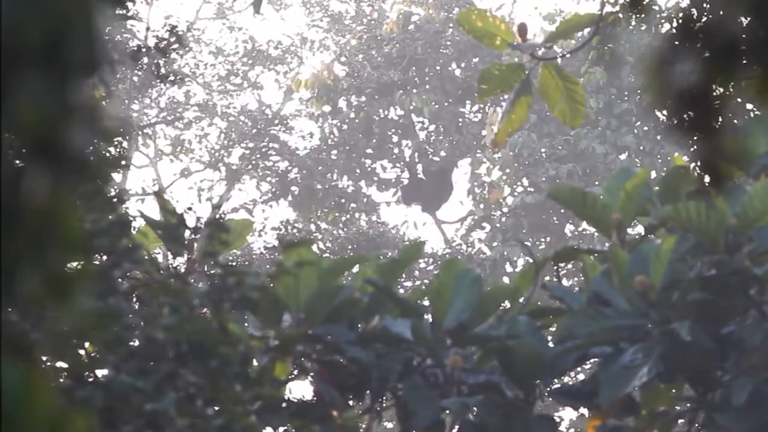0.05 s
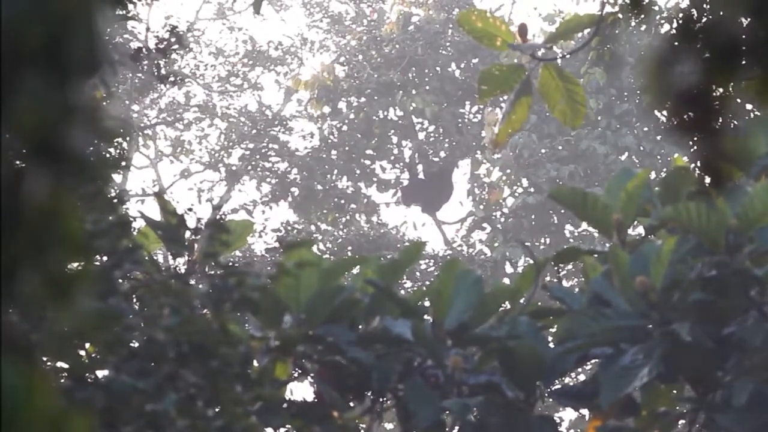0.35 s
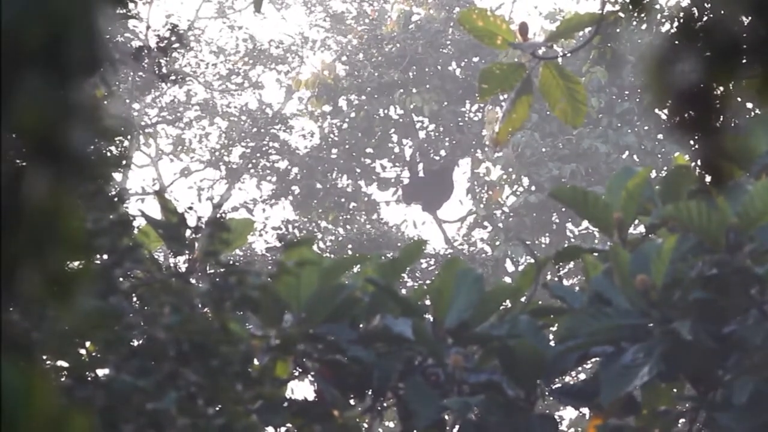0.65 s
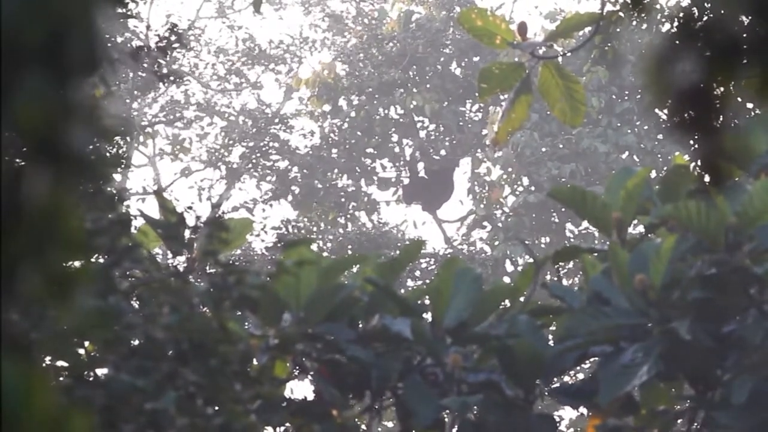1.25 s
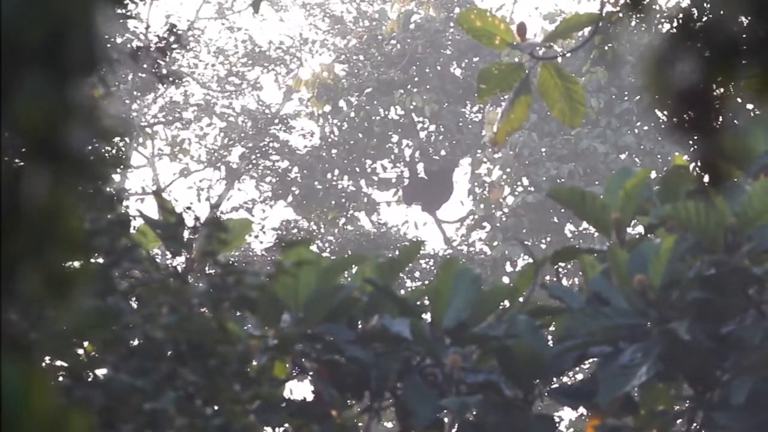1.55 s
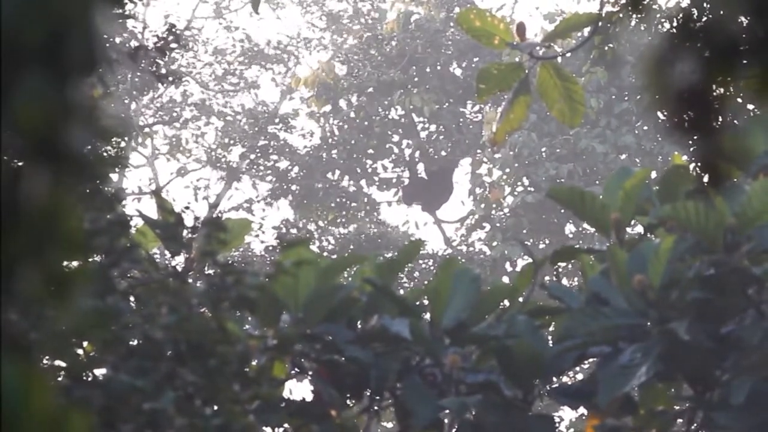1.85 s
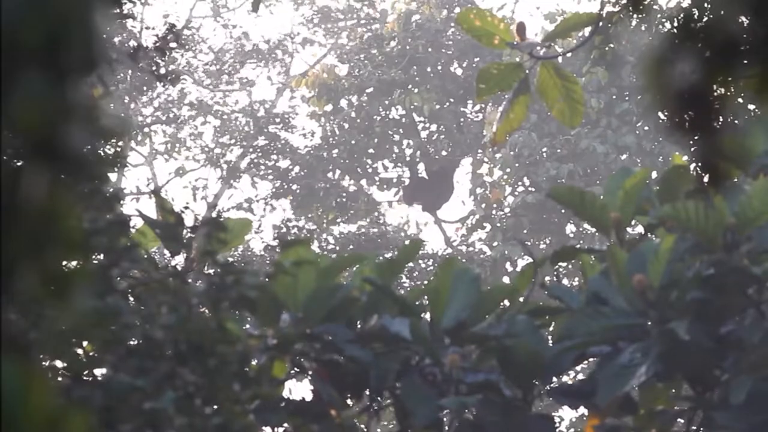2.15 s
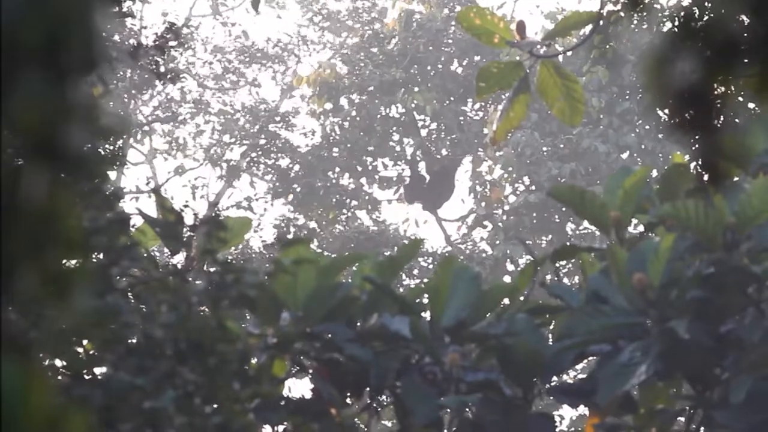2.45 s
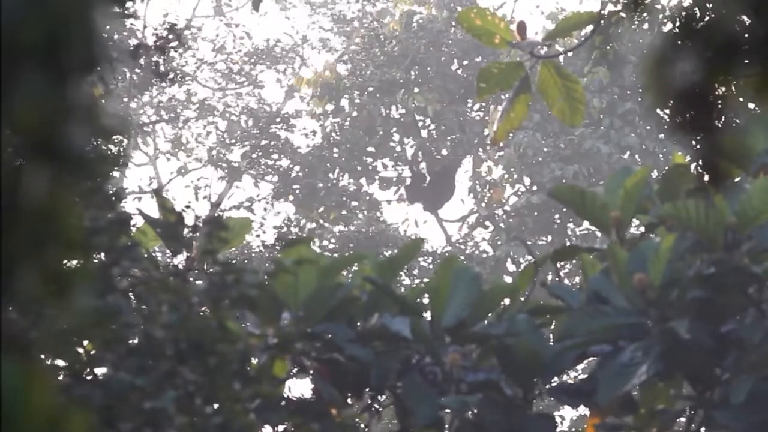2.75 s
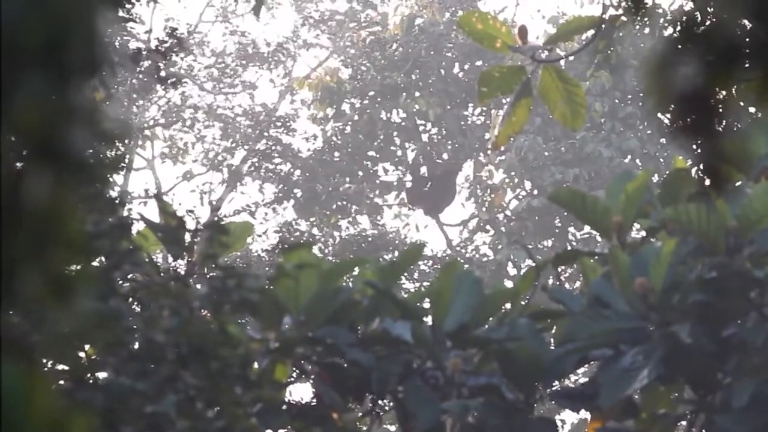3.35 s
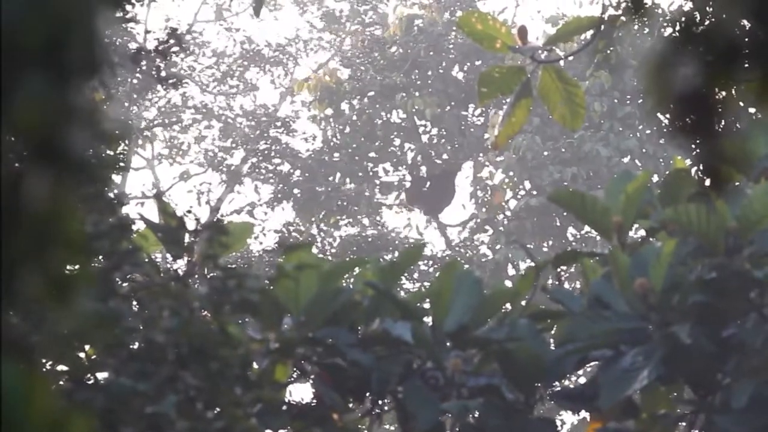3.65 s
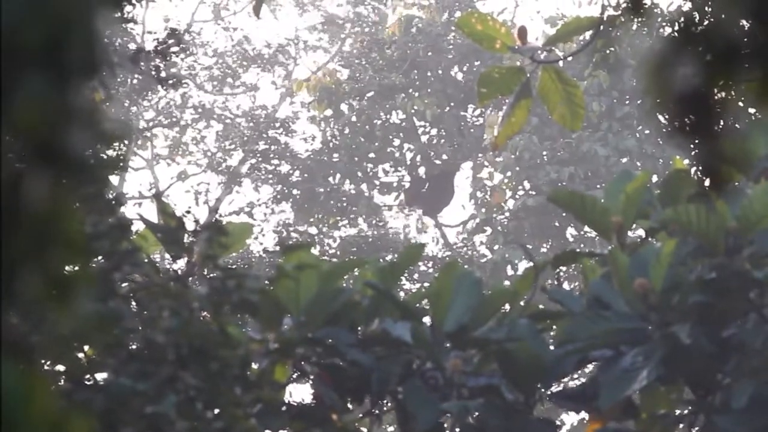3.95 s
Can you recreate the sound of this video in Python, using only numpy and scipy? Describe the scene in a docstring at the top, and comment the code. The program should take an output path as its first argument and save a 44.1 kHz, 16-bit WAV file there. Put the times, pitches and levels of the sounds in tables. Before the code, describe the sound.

Wild apes hoot loudly in an echoing forest over a steady high insect buzz.

```python
"""Rainforest with siamangs calling. One holds a high note that breaks into a run of loud falling hoots,
a second adds lower hoots, and throat sacs boom underneath. The trees return echoes and a long tail.
Cicadas buzz and a cricket ticks throughout, over steady forest noise; a katydid scrapes its wings
and small birds whistle near the end."""
import sys
import numpy as np
from scipy import signal
from scipy.fft import rfft, irfft
from scipy.io import wavfile

SR = 44100
rng = np.random.default_rng(int(sys.argv[2]) if len(sys.argv) > 2 else 0)


def to_wav(sig):
    """Store sig (one row per channel, or 1-D mono) as 16-bit WAV at the path in sys.argv[1].

    Samples outside -1..1 are clipped; the rate is SR.
    """
    pcm = np.clip(np.atleast_2d(sig), -1, 1) * 32767
    pcm = np.round(pcm).astype(np.int16)
    wavfile.write(sys.argv[1], SR, pcm.T)  # frames by channels


N = 176400
TIME = np.arange(N) / SR
RELEASE_S = 0.0095


def from_db(db):
    """Decibels to gain."""
    return 10 ** (np.asarray(db) / 20)


def unit_rms(x):
    """Scale to unit rms."""
    return x / np.sqrt(np.mean(x ** 2) + 1e-20)


def ramp(u):
    """Smooth step from 0 to 1."""
    return np.sin(np.pi / 2 * np.clip(u, 0, 1)) ** 2


def phase_of(hz):
    """Running phase of a pitch curve."""
    return 2 * np.pi * np.cumsum(hz) / SR


def high_pass(x, hz):
    """Third-order Butterworth high-pass."""
    return signal.sosfilt(signal.butter(3, hz, "high", fs=SR, output="sos"), x + 1e-18)


def noise(gain_at):
    """Unit-rms noise shaped by gain_at(frequency)."""
    hz = np.maximum(np.fft.rfftfreq(N, 1 / SR), 1)
    return unit_rms(irfft(rfft(rng.standard_normal(N)) * gain_at(hz), N))


def coloured(spectrum):
    """Unit-rms noise following (frequency [Hz], relative density [dB]) points."""
    hz, db = np.transpose(spectrum)
    return noise(lambda f: from_db(np.interp(np.log(f), np.log(hz), db)))


def drift(rate_hz):
    """Unit-rms random wavering up to about rate_hz."""
    return noise(lambda f: 1 / (1 + (f / rate_hz) ** 2))


def glides(notes, edge_s, jitter):
    """Wavering sine glides with soft edges."""
    out = np.zeros(N)
    waver = 1 + jitter * drift(35)
    for start_s, length_s, from_hz, to_hz, db in notes:
        span = (TIME >= start_s) & (TIME < start_s + length_s)
        t = TIME[span] - start_s
        hz = (from_hz + (to_hz - from_hz) * t / length_s) * waver[span]
        envelope = ramp(t / edge_s) * ramp((length_s - t) / edge_s)
        out[span] += np.sqrt(2) * from_db(db) * envelope * np.sin(phase_of(hz))
    return out


def held_note():
    """First ape: a clean note that swells ever more deeply, then lingers weakly into its first hoot."""
    # (time [s], pitch [Hz], fundamental level [dB], overtone level [dB])
    contour = [(0, 877.3, -27, -35.5), (0.071, 863, -24.5, -34), (.19, 858, -23, -35),
               (.23, 857.4, -23, -34), (.28, 868.3, -28.5, -32.5), (.335, 865.7, -22, -31.5),
               (.375, 872.2, -25.5, -34.5), (0.411, 861.5, -24.5, -29.5), (0.444, 855, -25.5, -37.5),
               (0.498, 870, -20.5, -30), (0.537, 840.8, -29.5, -44), (0.557, 851, -35, -39),
               (.587, 874.6, -20, -31.5), (0.614, 856.8, -21.5, -33), (.635, 854, -42, -46),
               (.69, 864, -35.5, -41), (.745, 862, -40, -36.5)]
    # harmonics 2-8 (offset from overtone level [dB])
    offsets_db = [-6, -1.5, -8.5, -8, -24.5, -27, -32]
    jitter, flicker_db = 0.0018, 1.5
    times_s, *columns = np.transpose(contour)
    hz, db, overtone_db = [np.interp(TIME, times_s, column) for column in columns]
    phase = phase_of(hz * (1 + jitter * drift(25)))
    overtones = sum(from_db(offset_db + flicker_db * drift(10)) * np.sin(k * phase)
                    for k, offset_db in enumerate(offsets_db, 2))
    tone = from_db(db) * np.sin(phase) + from_db(overtone_db) * overtones
    return np.sqrt(2) * tone * ramp((times_s[-1] - TIME) / RELEASE_S)


def throat_booms():
    """Throat sacs resonate in low, nearly pure notes."""
    # (start [s], length [s], start pitch [Hz], end pitch [Hz], level [dB])
    notes = [(-.05, 0.18, 347, 339.3, -38.5), (.125, 0.082, 291, 297, -42), (.36, 0.13, 356.7, 329.3, -42),
             (.46, 0.136, 335, 345, -41), (.725, 0.077, 337, 333.3, -43), (.825, 0.124, 278, 312, -38),
             (1.605, 0.13, 315, 372, -41), (2.505, 0.12, 271, 319, -38.5), (3.72, 0.12, 249.7, 259, -55)]
    return glides(notes, edge_s=0.024, jitter=0.019)


def forest_background():
    """Steady broadband noise, strongest in the midrange."""
    # (frequency [Hz], relative density [dB])
    spectrum = [(25, -60), (55, -14), (110, -13.5), (190, -13), (260, -7), (380, -6), (550, -6.5),
                (760, -1), (980, -12.5), (1250, 0.5), (1520, 0.5), (1750, -11.5), (2500, -13),
                (3150, -14.5), (4000, -18), (5200, -20.5), (11000, -32.5), (13000, -39), (15500, -37)]
    return from_db(-42.5) * coloured(spectrum)


def cicadas():
    """A chorus of high noise pulsing at the tymbal rate."""
    # (frequency [Hz], relative density [dB])
    spectrum = [(4000, -38), (5200, -17.5), (5700, -9), (6200, -7.5), (6600, -14), (7200, -8), (7900, -1.5),
                (8500, -3), (9100, 0.5), (9800, -2), (10300, -13), (11200, -20.5), (12500, -32),
                (15500, -50)]
    tymbal_hz, depth = 121, 0.15
    beat = phase_of(tymbal_hz + 0.3 * drift(2))
    pulsing = 1 + depth * (np.cos(beat) + 0.21 * np.cos(2 * beat))
    return from_db(-41) * unit_rms(coloured(spectrum) * pulsing)


def cricket():
    """Faint ticking in a narrow noise band."""
    centre_hz, half_width_hz, ticks_per_s = 4630, 150, 20
    ticks = 0.6 + ramp(np.sin(phase_of(ticks_per_s + drift(2.6))))
    band = noise(lambda f: 1 / (1 + ((f - centre_hz) / half_width_hz) ** 2))
    return from_db(-60) * unit_rms(ticks * band)


def katydid():
    """Short, very high wing scrapes."""
    # (start [s], length [s], level [dB])
    scrapes = [(.195, .022, -65), (2.83, .065, -61), (3.09, .06, -69)]
    centre_hz, half_width_hz, edge_s = 13900, 1400, 0.01
    gate = sum(from_db(db) * ramp((TIME - start_s) / edge_s) * ramp((start_s + length_s - TIME) / edge_s)
               for start_s, length_s, db in scrapes)
    return gate * noise(lambda f: 1 / (1 + ((f - centre_hz) / half_width_hz) ** 4))


def hoots(calls, attack_s, scoop, fall_hz_per_s, fade_db_per_s, harmonics_db):
    """Each hoot scoops up to pitch, holds, then slides down, growing weaker, darker and rougher."""
    # throat resonances, applied to the overtones (frequency [Hz], gain [dB])
    throat = [(1000, -17.5), (1180, -8), (1350, -1), (1700, -1.5), (1900, -4), (2300, -6.5), (2580, 0),
              (2900, -5), (3400, 0), (3800, -6), (4250, -1.5)]
    bend_s, bloom_s, darken_db_per_s = 0.0039, 0.015, 80
    dip_hz, dip_width_hz, dip_db = 785, 20, -11
    waver = 1 + 0.005 * drift(84)
    rasp_rad = 0.06 * drift(227)
    out = np.zeros(N)
    for start_s, top_hz, hold_s, fall_s, db, octave_db, treble_db in calls:
        end_s = hold_s + fall_s + RELEASE_S
        span = (TIME >= start_s - attack_s / 2) & (TIME < start_s + end_s)
        t = TIME[span] - start_s
        falling_s = bend_s * np.logaddexp(0, (t - hold_s) / bend_s)  # time into the fall, soft knee
        hz = top_hz * (1 - scoop * (1 - ramp(t / attack_s))) - fall_hz_per_s * falling_s
        phase = phase_of(hz * waver[span]) + rasp_rad[span] * ramp(2 * falling_s / fall_s)
        dip = np.exp(-((hz - dip_hz) / dip_width_hz) ** 2)  # fundamental dips briefly passing dip_hz
        tone = from_db(harmonics_db[0] + dip_db * dip) * np.sin(phase)
        for k, harmonic_db in enumerate(harmonics_db[1:], 2):
            boost = from_db(octave_db) if k == 2 else from_db(treble_db) * ramp(t / bloom_s)
            throat_db = np.interp(k * hz, *np.transpose(throat))
            tone += boost * from_db(harmonic_db + throat_db - darken_db_per_s * falling_s) * np.sin(k * phase)
        envelope = ramp((t / attack_s + 0.5) / 1.8) * ramp((end_s - t) / RELEASE_S)
        out[span] += np.sqrt(2) * from_db(db - fade_db_per_s * falling_s) * envelope * tone
    return high_pass(out, 396)


def low_hoots():
    """Second ape: three quieter, lower hoots."""
    # (start [s], top pitch [Hz], hold [s], fall [s], level [dB], octave boost [dB], treble boost [dB])
    calls = [(.220, 665, .028, 0.054, -31, 0, 2.5), (.925, 680, .028, 0.055, -30.5, -1, -2),
             (2.617, 664, 0.033, 0.062, -33.5, 0, 2.5)]
    # (attack [s], scoop [fraction of pitch], fall [Hz/s], fade [dB/s], harmonics 1-8 [dB])
    voice = dict(attack_s=.018, scoop=0.0234, fall_hz_per_s=3400, fade_db_per_s=110, harmonics_db=[1.5, -8, -19, -18.5, -13, -26, -21, -18.5])
    return hoots(calls, **voice)


def high_hoots():
    """First ape: a run of ten loud hoots that gradually slows."""
    # (start [s], top pitch [Hz], hold [s], fall [s], level [dB], octave boost [dB], treble boost [dB])
    calls = [(.703, 873.7, .020, 0.033, -22.5, 4, 1), (.850, 855.3, .030, 0.039, -20, 2, -0.5),
             (1.017, 862.5, 0.024, 0.049, -17.5, 0.5, 0.5), (1.199, 845.4, .023, 0.05, -18.5, 2.5, 1),
             (1.383, 857.3, 0.025, 0.0613, -17.5, 0, 0.5), (1.590, 851, 0.02, 0.058, -17, -3, -2),
             (1.803, 843, .026, 0.054, -17, 0.5, -1), (2.021, 853, 0.023, 0.058, -17, -2, -1.5),
             (2.243, 846.3, 0.027, 0.055, -18, 0, -0.5), (2.461, 844.2, 0.03, 0.059, -16.5, -1.5, -1.5)]
    # (attack [s], scoop [fraction of pitch], fall [Hz/s], fade [dB/s], harmonics 1-8 [dB])
    voice = dict(attack_s=.018, scoop=0.03063, fall_hz_per_s=5400, fade_db_per_s=100, harmonics_db=[-2, -3.5, -17.5, -21.5, -20.5, -32, -34, -42])
    return hoots(calls, **voice)


def bird_whistles():
    """Small birds: thin whistles and quick upward chirps."""
    # (start [s], length [s], start pitch [Hz], end pitch [Hz], level [dB])
    notes = [(2.94, .14, 2415, 2420, -49), (3.585, 0.082, 3175, 3030, -52.5),
             (3.648, 0.023, 1820, 2900, -45), (3.74, 0.123, 2720, 2960, -57),
             (3.92, 0.02, 2900, 4500, -44.5)]
    return glides(notes, edge_s=0.0084, jitter=0.0055)


def through_leaves(x, treble_db):
    """Foliage takes treble out of sound passing through."""
    edge_hz, transition_hz = 1800, 1200
    shelf = ramp((np.fft.rfftfreq(N, 1 / SR) - edge_hz) / transition_hz)
    return irfft(rfft(x) * from_db(treble_db * shelf), N)


def reflections(t60_s, build_s):
    """A swelling, then decaying cloud of reflections with unit energy."""
    envelope = np.exp(-np.log(1000) * TIME / t60_s) * ramp(TIME / build_s)
    return unit_rms(rng.standard_normal(N) * envelope) / np.sqrt(N)


def trees(x):
    """A wash from near trunks, a long tail from the far forest, leaf scatter and three distinct echoes."""
    # (delay [s], level [dB], low cut [Hz])
    trunk_echo = (.062, -6, 1150)
    weak_echoes = [(.013, -20.5, 424), (.105, -18, 450)]
    near = from_db(-9.5) * reflections(t60_s=1, build_s=0.016)
    far = from_db(-6.5) * reflections(t60_s=2.63, build_s=0.016)
    leaves = from_db(-2) * high_pass(reflections(t60_s=0.13, build_s=0.009), 2220)
    response = near + far + leaves
    for delay_s, db, low_cut_hz in [trunk_echo] + weak_echoes:
        echo = high_pass(signal.unit_impulse(N, int(delay_s * SR)), low_cut_hz)
        response += from_db(db) * through_leaves(echo, treble_db=-7)
    return signal.fftconvolve(x, response)[:N]


def scene():
    """Apes and birds among the trees, over insects and forest noise; mono."""
    held, booms = held_note(), throat_booms()
    hooting = high_hoots() + low_hoots()
    birds = bird_whistles()
    direct = held + booms + birds + through_leaves(hooting, treble_db=-3)
    wet = trees(hooting + from_db(-5) * held + from_db(-1) * booms + from_db(-4.5) * birds)
    return (direct + wet + cicadas() + cricket() + katydid() + forest_background())[None]


def record(dry):
    """Steep elliptic low-pass."""
    cutoff_hz = 15750
    return signal.sosfilt(signal.ellip(10, 0.1, 80, cutoff_hz, fs=SR, output="sos"), dry)


dry = scene()
out = record(dry)
to_wav(out)
```